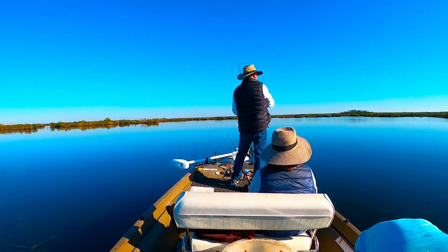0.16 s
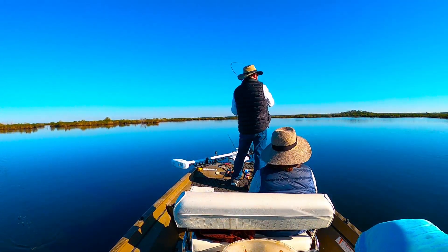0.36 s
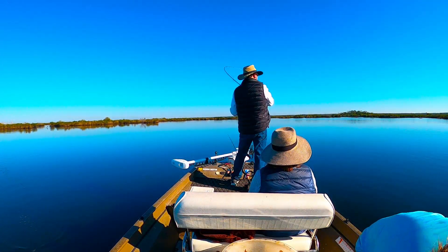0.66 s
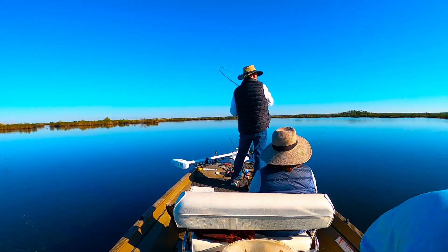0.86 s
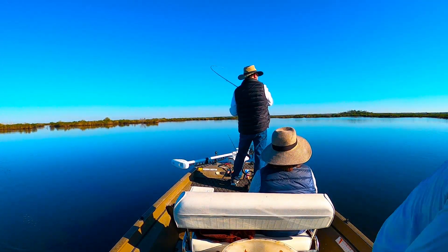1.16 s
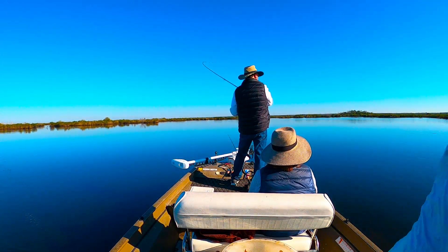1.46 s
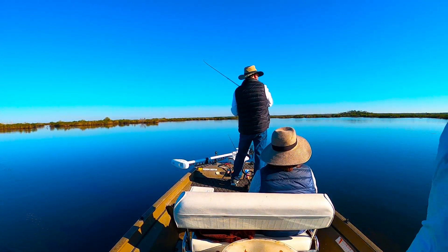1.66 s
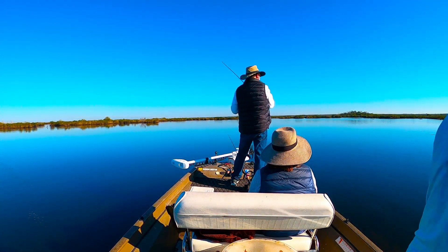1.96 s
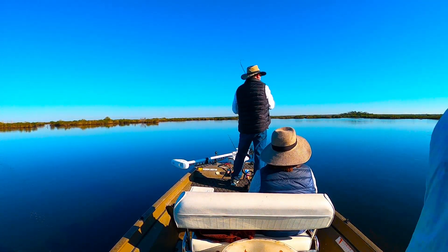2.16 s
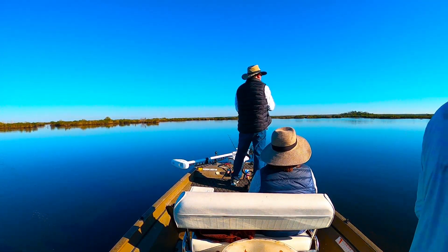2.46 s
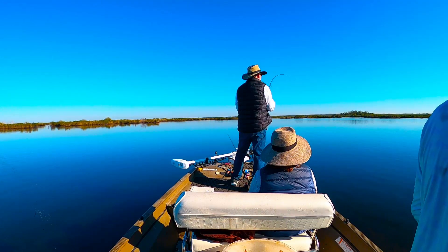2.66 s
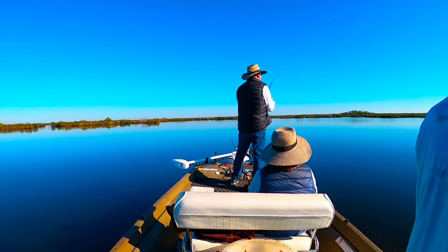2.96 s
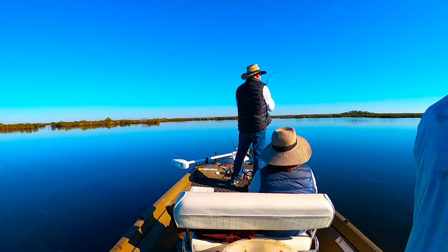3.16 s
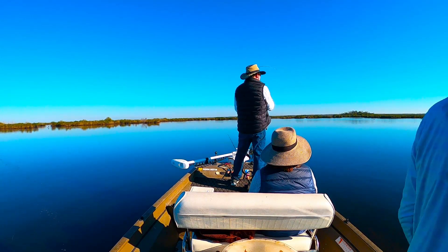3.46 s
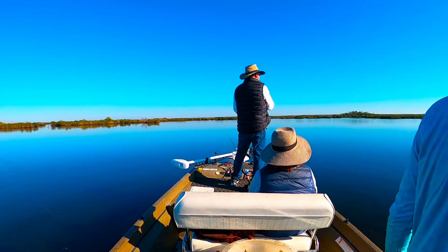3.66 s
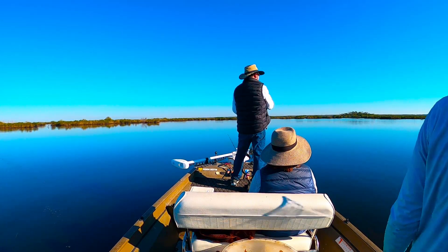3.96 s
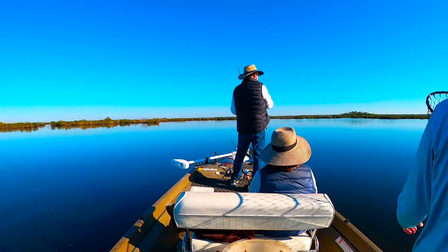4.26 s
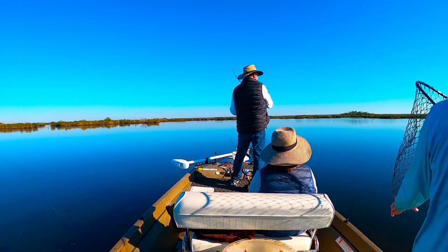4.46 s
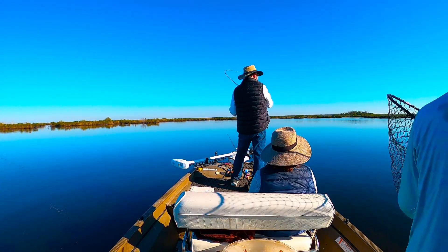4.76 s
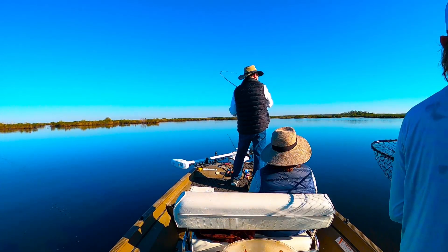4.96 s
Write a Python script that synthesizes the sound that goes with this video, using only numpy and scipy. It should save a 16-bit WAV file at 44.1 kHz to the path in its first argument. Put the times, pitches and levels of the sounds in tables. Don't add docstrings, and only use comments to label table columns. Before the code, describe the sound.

A metal net pole clatters and thumps in a small boat, then knocks, rubbery squeaks, faint water gurgles and a heavy low double thud.

```python
import sys
import numpy as np
from scipy import signal
from scipy.fft import rfft, irfft
from scipy.io import wavfile
from scipy.ndimage import uniform_filter1d

SR = 44100
rng = np.random.default_rng(int(sys.argv[2]) if len(sys.argv) > 2 else 0)


def amp(db):
    return 10 ** (np.asarray(db, float) / 20)


def write(x):
    x = np.atleast_2d(x).T
    wavfile.write(sys.argv[1], SR, np.round(np.clip(x, -1, 1) * 32767).astype(np.int16))


N = 225042

SOFTER = 0.12
LEAD_DB, LEAD_S = -12.5, 0.019


def evened(x):
    return x / np.sqrt(np.mean(x ** 2) + 1e-20)


def peaked(x):
    return x / (np.abs(x).max() + 1e-20)


def wander(count, size):
    return evened(uniform_filter1d(rng.standard_normal(count), size=size))


def envelope(rows):
    times_s, levels_db = np.transpose(rows)
    return amp(np.interp(np.arange(N) / SR, times_s, levels_db))


def colour_of(colour, hz):
    f, db = np.transpose(colour)
    return amp(np.interp(np.log(hz + 1), np.log(f + 1), db, -120, -120))


def add(mix, s, sound):
    part = mix[max(round(s * SR), 0):][:len(sound)]
    faded = sound * np.minimum(np.linspace(4, 0, len(sound)), 1)
    part += faded[:len(part)]


def add_before(mix, s, sound):
    add(mix[:round(s * SR)][::-1], 0, sound)


def dying(t60, seconds):
    return amp(-60 * np.arange(round(seconds * SR)) / SR / max(t60, .003))


def ring(modes, spread_db, ring_share, seconds=.5, slope_db=0, detune=0.0096):
    t = np.arange(round(seconds * SR)) / SR
    chance = rng.standard_normal((len(modes), 2))
    out = np.zeros(len(t))
    for (hz, db, t60), (a, b) in zip(modes, chance):
        level = amp(db + spread_db * a + slope_db * np.log2(hz / 2000)) * np.sign(b)
        tone = np.sin(2 * np.pi * hz * (1 + detune * b) * t)
        out += level * dying(min(t60, .6) * ring_share, seconds) * tone
    return out


def burst(colour, t60, rise, slope_db=0, size=SR // 4):
    fine, t = np.fft.rfftfreq(size, 1 / SR), np.arange(size) / SR
    tilt = amp(slope_db * np.log2(fine / 2000 + 0.084))
    x = rfft(rng.standard_normal(size)) * colour_of(colour, fine) * tilt
    hz, frame, z = signal.stft(irfft(x, size), SR, nperseg=256, noverlap=192)
    band_t60 = max(t60, .01) * (hz[:, None] / 1500 + 0.034) ** -.3
    z = z * amp(-60 * frame / band_t60)
    sound = signal.istft(z, SR, nperseg=256, noverlap=192)[1][:size]
    return peaked(sound * (1 - np.exp(-(t / max(rise, 3e-4)) ** 2)))


def resonate(x, hz, width_hz):
    turn = np.exp(2j * np.pi * np.cumsum(hz) / SR)
    r = np.exp(-np.pi * width_hz / SR)
    return 2 * (turn * signal.lfilter([(1 - r) ** 2], [1, -2 * r, r * r], x / turn)).real


def noise(colour, size, patchy_db, flicker_db):
    frames, hz = N * 4 // size + 5, np.fft.rfftfreq(size, 1 / SR)
    a, b, patches = rng.standard_normal((frames, len(hz), 3)).T
    patches = uniform_filter1d(patches, size=5, axis=0)
    patches = evened(uniform_filter1d(patches, size=8, axis=1))
    unsteady = amp(patchy_db * patches + flicker_db * wander(frames, 3))
    z = (a + 1j * b) * colour_of(colour, hz)[:, None] * unsteady
    return evened(signal.istft(z, nperseg=size, noverlap=size * 3 // 4)[1][:N])


def rumble():
    # time_s, level_db
    rumble_level = [(0.0, -47.5), (0.11, -44.5), (0.99, -50.5), (1.73, -47.5), (2.83, -56), (3.15, -53),
                    (3.37, -56.5), (3.66, -51), (3.81, -43), (3.89, -42.5), (4.1, -51.5), (4.86, -56),
                    (5.1, -55.5)]
    # freq_hz, level_db per Hz
    rumble_colour = [(7.1, -36.5), (12, -3), (70, -1), (83, -0.5), (98, -20), (133, -3), (148, -20),
                     (168, -17.5), (259, -24), (371, -35.5), (399, -28), (429, -46), (470, -36),
                     (563, -40.5), (900, -59), (1170, -67), (1980, -120)]
    return envelope(rumble_level) * noise(rumble_colour, size=4096, patchy_db=-0.5, flicker_db=0.5)


def hiss():
    # freq_hz, level_db per Hz
    hiss_colour = [(180, -29.5), (300, -3.5), (684, -11), (921, -8.5), (1280, -5), (1720, -10), (6560, -15),
                   (8680, -15), (11100, -27), (15500, -38.5)]
    return amp(-81) * noise(hiss_colour, size=1024, patchy_db=1.2, flicker_db=1.2)


def rustle():
    # time_s, level_db
    rustle_level = [(0.0, -51.5), (0.2, -56), (0.3, -66), (0.42, -80), (0.52, -81), (1.02, -73),
                    (1.09, -65.5), (1.15, -77.5), (1.4, -69.5), (1.77, -59), (2.02, -66), (2.25, -73),
                    (2.38, -72.5), (3.03, -73), (3.25, -70.5), (3.4, -68.5), (3.64, -63.5), (4.33, -90.5),
                    (4.6, -97), (4.67, -69), (4.8, -81.5), (5.1, -71.5)]
    # freq_hz, level_db per Hz
    rustle_colour = [(240, -28.5), (400, -4), (425, -10), (466, -7), (808, -13), (1990, -12.5), (3730, -18),
                     (5900, -18), (6870, -19), (15500, -30.5)]
    sizes = amp(3 * np.minimum(rng.exponential(1, N), 4))
    slips = sizes * (rng.random(N) < 70 / SR)
    grain = 3.6 + evened(signal.oaconvolve(slips, np.hanning(700))[:N])
    sound = evened(grain * noise(rustle_colour, size=256, patchy_db=1.0, flicker_db=-1.5))
    return envelope(rustle_level) * amp(-6.0) * sound


def clanks():
    # start_s, peak_db, brightness_db per octave, chatter_t60_s
    knocks = [(0.0004, -20, 1.5, 0.067), (0.0226, -28.5, 3, 0.044), (0.102, -17, 2, 0.12),
              (0.1227, -24.5, 2.5, 0.082), (0.2117, -25.5, 2, 0.077), (0.2672, -24, 2, 0.076),
              (0.301, -29, 1.5, 0.083), (0.337, -40, 3, 0.12), (0.3879, -37.5, 1, 0.13),
              (0.4313, -48.5, 6.5, 0.055), (0.444, -51, 23, 0.077)]
    # freq_hz, level_db, t60_s
    pole_modes = [(874, -12, .14), (1010, -10, .14), (1225, -2, .11), (1340, -4, .13), (2326, -2, .1),
                  (2435, -3, .095), (2580, -3, .13), (2975, -5, .13), (3470, -12, .08), (3844, -9, .09),
                  (4220, -13, .07), (4947, -12, .06), (5300, -14, .06), (6115, -17, .05)]
    # freq_hz, level_db per Hz
    clash_colour = [(180, -38.5), (300, -6.5), (467, -8.5), (691, -18), (1000, -11.5), (1270, -5),
                    (1600, -16.5), (2070, -18), (2400, -10.5), (2730, -19.5), (7420, -30), (15000, -57)]
    out = np.zeros(N)
    for s, db, slope_db, t60 in knocks:
        chatter = 1 + .25 * wander(SR // 4, 90)
        modes = ring(pole_modes, 2.5, .5 + 4 * t60, .25, slope_db, .003)
        tube = peaked(modes * chatter * np.minimum(np.arange(SR // 4) / 150, 1))
        clash = burst(clash_colour, 1.4 * t60, 0.00063, slope_db)
        add(out, s - .002, amp(db) * (amp(-1.5) * tube + clash))
        if s > .05:
            scrape = burst(clash_colour, 0.049, 0.0034, slope_db + 11.0)[:SR // 25 + 1]
            add_before(out, s, amp(db - 12.5) * scrape)
    return out


def thumps():
    # start_s, peak_db, panel_hz, ring_t60_s, board_knock_db (relative)
    steps = [(0.027, -13, 183, 0.12, -16), (0.027, -15, 580, 0.024, -33), (0.051, -21.5, 61, 0.19, -29),
             (0.146, -27.5, 142, 0.12, -8), (0.296, -36, 183, 0.33, -2.5),
             (0.375, -19.5, 169.5, 0.11, -9.5), (0.373, -21, 665, 0.036, -14),
             (0.477, -32, 172.5, 0.17, -23.5), (0.478, -56, 620, 0.073, -15),
             (0.375, -35.5, 1135, 0.02, -27), (0.377, -33, 1730, 0.014, -20), (0.693, -47, 224, 0.1, -31.5),
             (0.713, -40.5, 165, 0.17, -35), (0.74, -46.5, 219, 0.2, -12), (0.733, -56.5, 637, 0.24, -9.5),
             (1.044, -38.5, 145.8, 0.21, -30), (1.068, -35, 115, 0.13, -23), (1.056, -55, 444, 0.099, -21),
             (1.09, -58, 520, 0.09, -15), (1.412, -56, 56.5, 0.095, -8), (1.549, -13, 168, 0.12, -15),
             (1.564, -25, 332, 0.037, -5.5), (1.6198, -26, 2060, 0.016, -40),
             (1.648, -25.5, 134, 0.045, -18), (1.628, -27, 81.3, 0.17, -9),
             (1.773, -30.5, 154, 0.036, -15.5), (2.231, -42, 286, 0.14, -8.5), (2.248, -35, 262, 0.11, -20),
             (2.267, -41, 256, 0.094, -11.5), (2.304, -48.5, 239, 0.13, -19.5),
             (1.88, -51.5, 254.4, 0.44, -8.5), (2.871, -60, 285.3, 0.11, -11),
             (2.979, -42, 64.6, 0.98, -33), (4.496, -31.5, 146.4, 0.074, -25),
             (4.644, -47, 147.3, 0.23, -15), (4.673, -63.5, 589, 0.093, 1.5),
             (4.999, -54.5, 179, 0.42, -19), (5.08, -42, 55.6, 0.36, -42)]
    # start_s, peak_db, panel_hz, ring_t60_s, board_knock_db
    landing = [(3.638, -21, 106, 0.72, -19), (3.658, -11, 77.56, 0.14, -30.5),
               (3.684, -18.5, 334, 0.068, -1.5), (3.694, -11, 352.6, 0.1, -30),
               (3.708, -18.5, 195, 0.057, -31.5), (3.7215, -17, 190, 0.031, 1.5),
               (3.684, -29, 1267, 0.039, -32), (3.693, -30.5, 1280, 0.041, -25),
               (3.685, -31.5, 790, 0.098, -29.5), (3.722, -16.5, 1048, 0.069, -31.5),
               (3.735, -20.5, 1200, 0.036, -31), (3.838, -40.5, 1198, 0.061, -21),
               (3.962, -37, 147, 0.12, -35), (3.738, -17.5, 634, 0.098, -4.5),
               (3.755, -13, 77.3, 0.12, -36.5), (3.77, -20, 64.6, 0.23, -34),
               (3.836, -43.5, 64.6, 0.041, 5.5), (3.844, -34, 346, 0.11, -18),
               (3.892, -37.5, 65.4, 0.081, -8.5), (3.937, -29, 96, 0.43, -38),
               (4.011, -36.5, 319, 0.093, -18.5), (4.012, -31, 62.4, 0.25, -28)]
    # freq_hz, level_db, t60_s
    hull_modes = [(64.6, -9.5, 3.2), (142, -8, 2.3), (183, -8, 0.86), (263.5, -9, 0.53), (336.1, -11.5, 1),
                  (465, -6.5, 0.14)]
    # freq_hz, level_db, t60_s
    board_modes = [(609.8, 7.5, 0.078), (790, -2, 0.05), (1125.6, -7.5, 0.22), (1206, -1, 0.11),
                   (1280, -6, 0.073), (1470, -14.5, 0.23), (1654, -15, 0.11), (1793, -32.5, 0.03),
                   (1940, -30, 0.21), (2100, -34.5, 0.087)]
    # freq_hz, level_db per Hz
    knock_colour = [(120, -34), (200, 4), (358, -6.5), (751, -15), (1070, -23), (1820, -31), (6000, -48),
                    (7800, -77), (13200, -120)]
    out, t = np.zeros(N), np.arange(SR // 2) / SR
    for s, db, hz, t60, knock_db in steps + landing:
        rise = (0.0013 + 0.16 / hz) * amp(-SOFTER * (db + 10.0))
        stiffening = 1 + 0.35 * min(1, 150 / hz) * np.exp(-t / 0.014)
        panel = dying(t60, .5) * np.sin(2 * np.pi * hz * t * stiffening)
        hull = peaked(ring(hull_modes, 3, .35))
        hull = signal.lfilter(*signal.butter(2, 2.0 * hz, fs=SR), hull)
        body = panel + amp(-3.0) * hull * dying(6.4 * t60, .5)
        body = body * (1 - np.exp(-(t / max(rise, 1e-3)) ** 2))
        boards = ring(board_modes, 3, .4, .25) * (1 - np.exp(-t[:SR // 4] / .001))
        knock = burst(knock_colour, 1.27 * t60, 0.81 * rise) + amp(-8.5) * peaked(boards)
        brush = burst(knock_colour, 3 * LEAD_S, 0.0012, size=3072)
        add(out, s, amp(db) * peaked(body))
        add(out, s, amp(db + knock_db + 5.0) * knock)
        add_before(out, s, amp(db + knock_db + LEAD_DB) * brush)
    return signal.lfilter(*signal.butter(4, 52, "high", fs=SR), out)


def whistles():
    # start_s, length_s, pitch_hz, level_db
    chirps = [(1.81, .03, 2620, -71), (1.86, .03, 2230, -70), (2.755, .09, 2230, -72),
              (1.36, .09, 1020, -81), (3.06, .135, 14000, -80), (.33, .14, 8600, -68),
              (2.75, .1, 5650, -84), (2.49, .08, 5450, -81), (2.55, .15, 5500, -86), (2.67, .1, 5050, -85),
              (2.81, .12, 3850, -85), (2.57, .05, 1650, -73), (2.83, .14, 1800, -79), (.71, .09, 1780, -79),
              (.76, .13, 1660, -79), (1.84, .05, 2650, -74), (1.83, .05, 2000, -74), (2.21, .05, 1850, -74)]
    out = np.zeros(N)
    for s, length, hz, db in chirps:
        t = np.arange(0, length, 1 / SR)
        pitch_hz = hz + 5e-3 * hz * np.sin(70 * t + 6 * rng.random())
        line = evened(resonate(rng.standard_normal(len(t)), pitch_hz, .02 * hz + 40))
        flutter = amp(3 * wander(SR // 4, 350))[:len(t)]
        add(out, s, amp(db) * line * flutter * signal.windows.tukey(len(t), .6))
    return out


def ticks():
    # start_s, peak_db, centre_hz, t60_s
    cracks = [(0.3648, -49, 2560, 0.025), (0.375, -34, 1290, 0.042), (0.7165, -62.5, 1550, 0.24),
              (1.0331, -48.5, 4560, 0.023), (1.032, -56, 2000, 0.042), (1.048, -58, 2530, 0.086),
              (4.638, -67.5, 2440, 0.13), (4.697, -66, 3507, 0.05), (5.018, -61, 1100, 0.14),
              (1.0683, -54.5, 1630, 0.14), (1.323, -60.5, 6600, 0.26), (1.5478, -49.5, 1620, 0.41),
              (1.6205, -32.5, 2840, 0.059), (1.633, -36.5, 2250, 0.17), (1.6915, -44, 2350, 0.79),
              (1.7185, -37.5, 2980, 0.077), (1.7532, -41, 2610, 0.06), (1.7761, -39.5, 2720, 0.047),
              (1.851, -53, 2190, 0.091), (1.9865, -52.5, 2070, 0.065), (2.2173, -56.5, 1940, 0.84),
              (2.2533, -61, 1970, 0.23), (3.1193, -57.5, 1460, 0.042), (3.2839, -54.5, 1580, 0.046),
              (3.4037, -57, 1970, 0.15), (3.6422, -46.5, 1640, 0.52), (3.688, -40, 1494, 0.55),
              (3.8402, -69.5, 1470, 0.036), (3.918, -57.5, 1460, 0.21), (4.0126, -62.5, 1710, 0.38),
              (4.0391, -61, 1760, 0.065), (4.49, -61, 2850, 0.07), (4.6751, -63, 2290, 0.072)]
    # start_s, peak_db, centre_hz, t60_s
    bright_ticks = [(0.5333, -60.5, 5160, 0.14), (1.3698, -62.5, 6550, 0.033), (1.4641, -69, 5000, 0.041),
                    (1.7057, -52, 2900, 0.033), (1.739, -42.5, 4000, 0.062), (1.834, -57, 7000, 0.04),
                    (1.853, -58.5, 7000, 0.072), (1.9446, -58, 6520, 0.036), (1.987, -55.5, 6000, 0.092),
                    (2.0138, -55, 6050, 0.044), (2.0417, -49, 4940, 0.056), (2.132, -49, 3100, 0.15),
                    (3.031, -70, 7800, 0.062), (3.083, -60, 7920, 0.057), (3.253, -60.5, 8000, 0.077),
                    (3.275, -60.5, 8000, 0.02), (2.168, -52, 3500, 0.065), (2.5311, -64, 3000, 0.04),
                    (3.064, -61.5, 6500, 0.063), (3.3164, -57.5, 5030, 0.033), (3.491, -61, 5100, 0.06),
                    (3.723, -31, 1392, 0.072), (3.743, -47, 3000, 0.1), (3.894, -59.5, 5000, 0.042),
                    (4.016, -66, 6000, 0.1), (4.035, -64, 6000, 0.076), (3.92, -69, 6500, 0.09),
                    (4.131, -58, 7160, 0.06), (4.132, -58, 3200, 0.06), (4.2862, -55, 5540, 0.084),
                    (5.016, -53, 3003, 0.14)]
    out = np.zeros(N)
    for rows, fall_db, rise in ((cracks, -7.5, 0.0011), (bright_ticks, -3.5, 0.0015)):
        for s, db, hz, t60 in rows:
            above_db = fall_db * np.log2(1 + 5000 / hz)
            colour = [(hz / 10, -40), (hz / 2, 1.16 * fall_db - 0.5), (hz, 0),
                      (hz + 5000, above_db), (16000, -32)]
            front = burst(colour, t60, rise * amp(-SOFTER * (db + 45)))
            brush = burst(colour, 3 * LEAD_S, 0.0012, size=3072)
            add(out, s - .001, amp(db) * front)
            add_before(out, s, amp(db + LEAD_DB + 1) * brush)
    return out


def squeaks():
    # start_s, length_s, first_hz, last_hz, level_db
    slides = [(0.703, 0.11, 1520, 1503, -71), (1.819, 0.091, 1560, 1270, -70),
              (1.897, 0.063, 1667, 1890, -66), (2.057, 0.073, 1985, 2390, -74),
              (1.954, 0.028, 1680, 1620, -73), (2.157, 0.074, 2350, 2200, -69.5),
              (2.205, 0.12, 2230, 1990, -65.5), (2.924, 0.057, 1450, 1520, -79.5),
              (2.306, 0.14, 2090, 1767, -75.5), (2.39, 0.13, 1720, 2170, -74),
              (2.482, 0.13, 1895, 1930, -65), (2.596, 0.11, 2060, 2040, -69),
              (2.686, 0.11, 1880, 1174, -63), (2.77, 0.075, 1163, 1106, -72), (2.81, 0.12, 1428, 1450, -67)]
    # multiple, level_db, width_hz
    orders = [
        (1, 0, 180),
        (.85, -8, 600),
        (2, -15, 500),
        (2.8, -21, 800),
    ]
    out = np.zeros(N)
    for s, length, first_hz, last_hz, level_db in slides:
        t = np.arange(0, length, 1 / SR)
        wobble = evened(uniform_filter1d(wander(SR // 2, 280), size=280))[:len(t)]
        glide_hz = last_hz + (first_hz - last_hz) * (1 - t / length) ** 1.2
        arch = .07 * np.sin(np.pi * t / length) - .04
        hz = glide_hz * (1 + .035 * wobble + arch)
        lines = amp(-7) * np.sin(2 * np.pi * np.cumsum(hz) / SR)
        for k, db, width_hz in orders:
            patchy = wander(SR // 2, 1500)[:len(t)]
            band = evened(resonate(rng.standard_normal(len(t)), k * hz, width_hz))
            lines += amp(db + 1.8 * k * patchy) * band
        grip = wander(SR // 2, 1100)[:len(t)]
        push = amp(level_db - 2 * t / length + 1.5 * grip)
        add(out, s, push * lines * signal.windows.tukey(len(t), .3))
    return out


def pings():
    # start_s, peak_db
    jingles = [(3.031, -72.5), (3.058, -61), (3.08, -73), (3.118, -75), (3.228, -54), (3.253, -59),
               (3.27, -61), (3.316, -58), (3.335, -66.5), (3.492, -70), (3.51, -70), (3.545, -62),
               (3.598, -73)]
    # freq_hz, level_db per Hz
    ping_colour = [(12900, -27), (13750, 1), (14600, 0), (15600, -9)]
    out = np.zeros(N)
    for s, db in jingles:
        add(out, s, amp(db) * burst(ping_colour, .12, .001, size=4096))
    return out


def gurgles():
    # start_s, peak_db, pitch_hz
    pockets = [(3.118, -72, 1470), (3.143, -62, 1333), (3.244, -63, 1174), (3.283, -56, 1050),
               (3.372, -53.5, 433), (3.372, -54, 597), (3.3, -61.5, 630), (3.352, -63, 810),
               (3.285, -57, 1720), (3.479, -59.5, 1014), (3.49, -66, 1830), (3.518, -64, 2200),
               (3.545, -64, 1405), (3.403, -49.5, 823), (3.419, -52.5, 730), (3.439, -53.5, 375),
               (3.459, -53.5, 680), (3.483, -56.5, 397), (3.519, -55.5, 720), (3.562, -56, 1007),
               (3.573, -59.5, 425), (3.589, -60.5, 572), (4.41, -63.5, 1056), (4.394, -73, 1203),
               (4.431, -74, 1044), (4.828, -70, 1045)]
    out, t = np.zeros(N), np.arange(SR // 5) / SR
    for s, db, hz in pockets:
        t60 = 36 / hz
        tone = np.sin(2 * np.pi * hz * t * (1 + 0.21 * t / t60)) * dying(t60, .2)
        tone *= 1 + .5 * wander(len(t), 120)
        add(out, s, amp(db) * peaked(tone * (1 - np.exp(-t / 0.0021))))
        slosh_colour = [(hz / 3, -25), (hz, 0), (3 * hz, -12), (9000, -30)]
        add(out, s, amp(db - 10.5) * burst(slosh_colour, 0.13, 0.012, size=4096))
    return out


def scattered(near):
    echoes = rng.standard_normal(SR // 4) * (rng.random(SR // 4) < .05) * dying(0.038, .25)
    echoes = signal.lfilter(*signal.butter(2, 500, "high", fs=SR), echoes)
    echoes = echoes / np.linalg.norm(echoes)
    return near + amp(-7.0) * signal.fftconvolve(near, echoes)[:N]


def scene():
    near = clanks() + thumps() + whistles() + ticks() + squeaks() + pings() + gurgles()
    return (scattered(near) + rustle() + rumble() + hiss())[None]


def top_cut(x):
    return signal.sosfilt(signal.butter(12, 15610, fs=SR, output="sos"), x)


def record(dry):
    dull = signal.lfilter(*signal.butter(2, 9500, fs=SR), dry)
    return top_cut(dull)


dry = scene()
out = record(dry)
write(out)
```